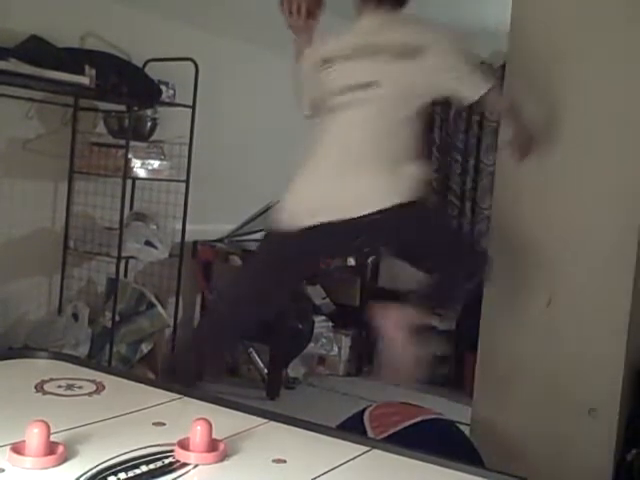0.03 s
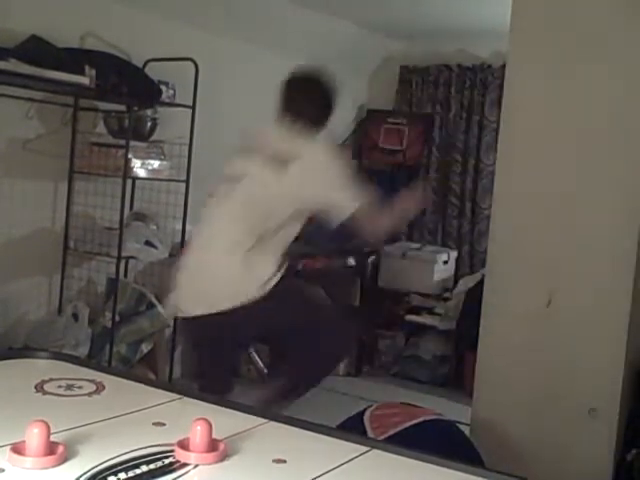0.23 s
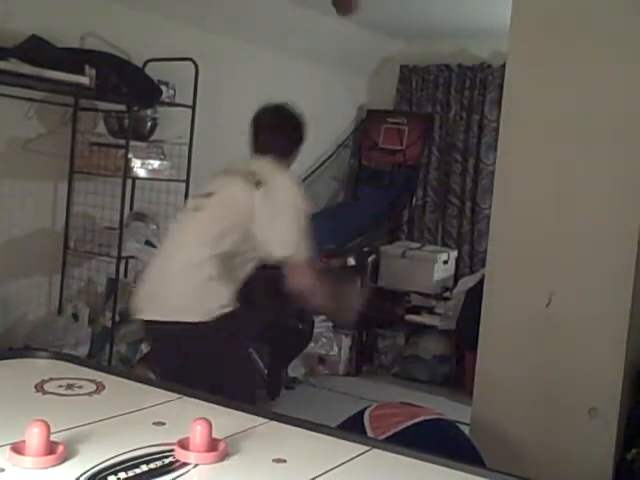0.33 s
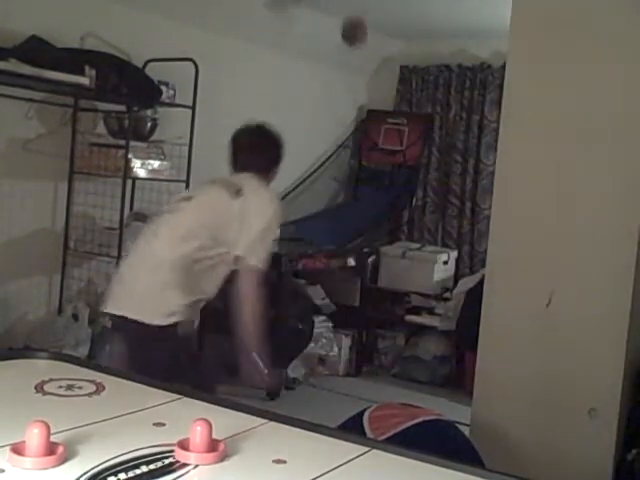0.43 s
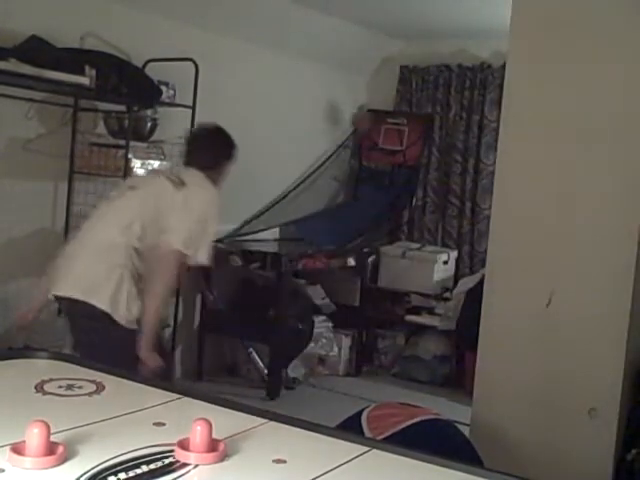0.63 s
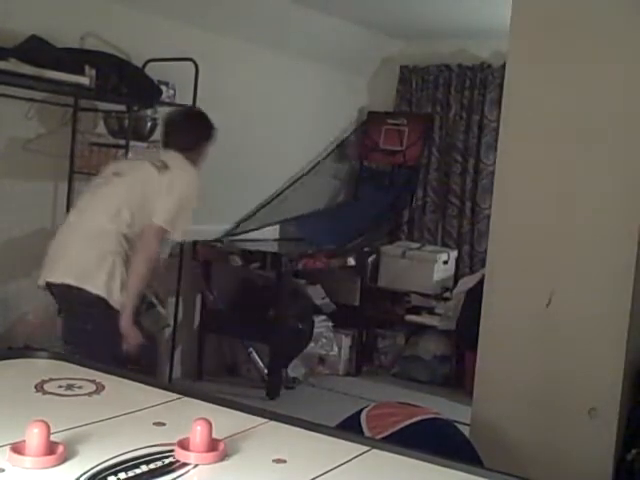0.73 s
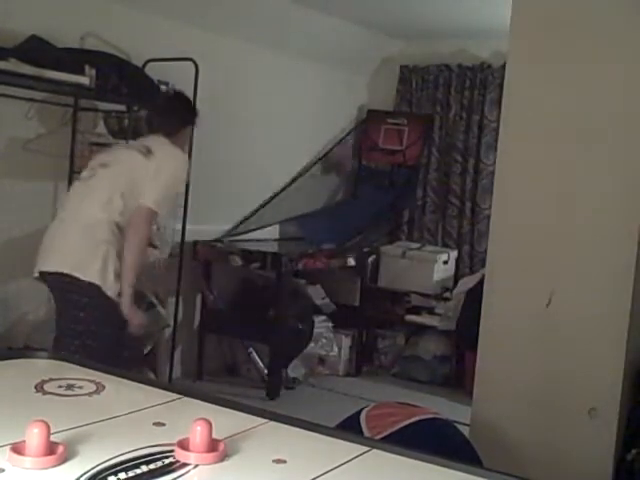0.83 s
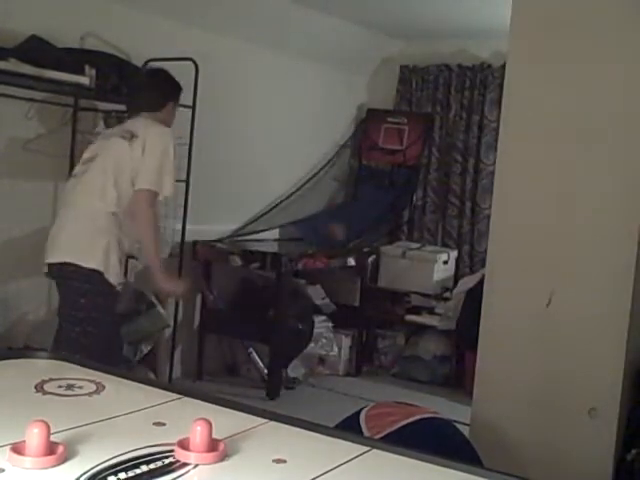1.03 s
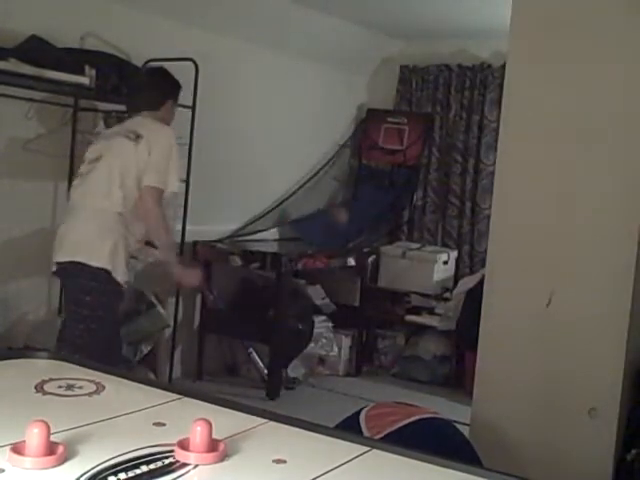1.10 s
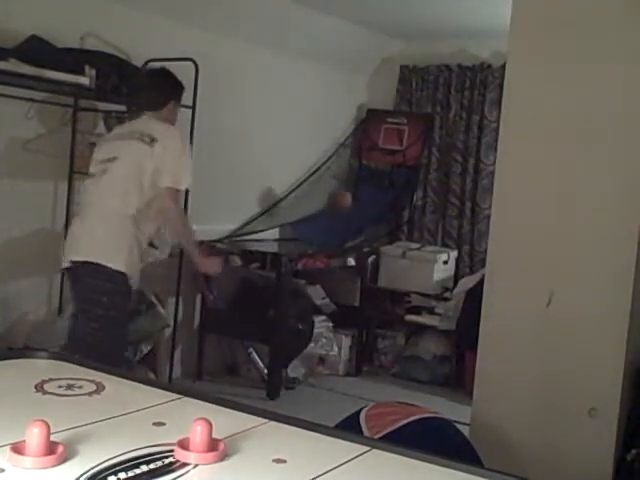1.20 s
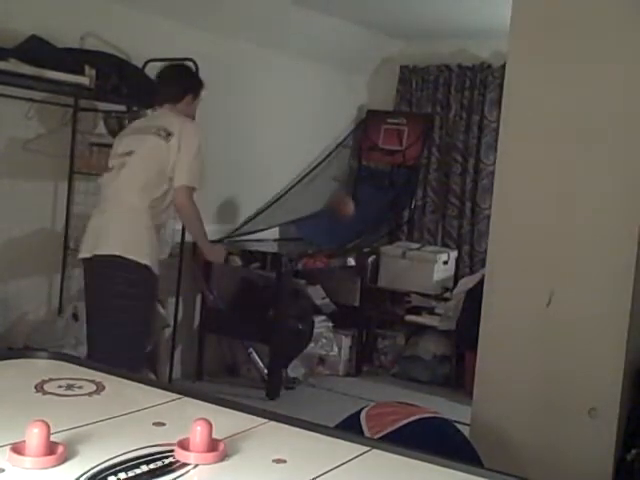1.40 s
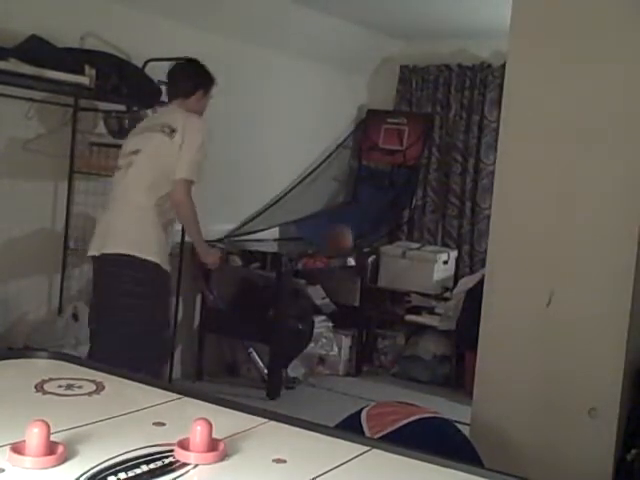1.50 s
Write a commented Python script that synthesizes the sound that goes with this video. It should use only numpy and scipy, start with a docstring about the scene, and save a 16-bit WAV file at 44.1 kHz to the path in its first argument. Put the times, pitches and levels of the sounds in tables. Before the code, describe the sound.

Small balls crack against an arcade basketball hoop just after a heavy landing thud indoors.

```python
"""Clothes rustle and a player lands from a jump on a carpeted floor, then steps aside: the boards boom,
the joists sway, the soles scuff. Small tossed balls crack against the backboard and rim of an arcade
hoop, rattle through the net, and one strikes again lower down. The blows ring the rim and shake the
stand and the floor. The small games room echoes them over a faint hiss."""
import sys
import numpy as np
from scipy import signal
from scipy.fft import rfft, irfft
from scipy.io import wavfile
from scipy.ndimage import uniform_filter1d

SR = 44100
rng = np.random.default_rng(int(sys.argv[2]) if len(sys.argv) > 2 else 0)


def wrap_up_sound(samples):
    """Save the sound to the file named by the first command line argument, as 16-bit audio."""
    columns = np.atleast_2d(samples).T
    # keep every value between -1 and 1, then stretch to whole-number steps
    tamed = np.clip(columns, -1, 1)
    steps = np.round(tamed * 32767).astype(np.int16)
    wavfile.write(sys.argv[1], SR, steps)


N = 68355

# Noise spectra. Each row: frequency in Hz, relative level in dB.
AIR_SPECTRUM = [(20, -3), (35, -2.5), (70, -8.5), (150, -16.5), (300, -18.5), (700, -25), (2000, -32),
                (6000, -36.5), (15500, -37.5)]
CLOTH_SPECTRUM = [(100, 15), (400, 0), (900, -4), (2000, -3), (4500, -3.5), (7000, -8), (15000, -13)]
THUD_SPECTRUM = [(30, -6), (110, 1), (260, 1.5), (360, -4), (500, -29), (900, -48), (3000, -70)]
SCUFF_SPECTRUM = [(150, 3), (550, -3.5), (800, -9), (1150, -6.5), (1700, -14.5), (3000, -19), (6000, -32),
                  (15000, -34.5)]
NET_SPECTRUM = [(100, 11), (400, -3.5), (1300, 0.5), (2500, -1.5), (4300, -6), (6000, -10.5), (10000, -19),
                (15000, -30)]
CRACK_SPECTRUM = [(200, -35), (900, -2), (2200, -4.5), (3300, -0.5), (4800, 2), (6800, -7), (9000, -2.5),
                  (11800, -8), (13500, -5.5), (16000, -2)]
ECHO_SPECTRUM = [(150, -9), (700, -5), (2000, 1.5), (3200, 3.5), (5000, 2.5), (6800, -0.5), (9000, 0.5),
                 (11800, -5), (15500, -6)]
BOARD_SPECTRUM = [(60, 3.5), (200, -2), (430, -1.5), (700, -5), (1100, -3.5), (1700, -10.5), (2800, -21),
                  (8000, -40)]
# Resonances. Each row: frequency in Hz, relative level in dB, T60 in seconds.
FLOOR_MODES = [(59.4, -5.5, 0.51), (109.7, -3, 0.25), (128, -5.5, .33), (164.6, -4, 0.15), (221.6, 2, 0.19),
               (247.6, -0.5, 0.19), (272.6, 2, 0.12), (318.1, -7, 0.21), (405, -11.5, .2), (553, -25, 0.3)]
JOIST_MODES = [(28.28, 14, 0.66), (43.2, -1, 0.48)]
STAND_MODES = [(45.2, -1, 0.35), (60.65, -1.5, 0.72), (128.5, 1.5, 0.46), (210.8, 5, .18),
               (259.6, -7, 0.23), (309.7, -3.5, 0.18), (418, 4, 0.18)]
RIM_MODES = [(544, -1, 0.54), (680, -8, 0.49), (966, 8, 0.17), (1092, -8, 0.088), (1168, -6, 0.63),
             (1495, 0, 0.33), (2550, -0.5, 0.4), (2770, 9.5, 0.17), (3090, -2, 0.14), (3295, 7.5, 0.11),
             (3410, 0.5, 0.31), (3870, -7, .26), (4234, -2.5, 0.66), (4900, -19, 0.2), (4921, 6, 0.093),
             (7430, -4, 0.34)]
# Clothes moving. Each row: centre in seconds, half length in seconds, level in dB.
SWISHES = [(.03, 0.076, -62), (.155, 0.066, -59.5), (.28, 0.035, -61), (.42, 0.16, -67),
           (.54, 0.047, -58.5), (.64, 0.084, -63), (.715, 0.049, -55.5)]
# Soles on carpet. Each row: centre and half length in seconds, pitch and width in Hz, level in dB.
SOLE_RUBS = [(.38, 0.081, 1100, 420, -62), (0.384, 0.081, 560, 270, -61), (0.68, 0.016, 780, 120, -68),
             (0.1973, 0.039, 294, 260, -59)]
# Feet on the floor. Each row: start in seconds, then boom, sway and scuff levels in dB.
FOOTFALLS = [(.208, -29.5, -37.5, -42.5), (0.2155, -18.5, -35.5, -47), (.256, -31.5, -39.5, -68),
             (0.311, -48, -33.5, -65), (.476, -45, -68, -52), (0.515, -44, -38, -58.5),
             (0.557, -48, -70, -65), (1.43, -66, -57, -72)]
# Balls in the net and on the cloth ramp. Each row: centre and half length in seconds, level in dB.
NET_RUNS = [(.885, 0.039, -43), (.94, 0.039, -47.5), (1.06, .04, -66), (1.25, 0.065, -66),
            (1.34, 0.034, -69), (1.505, 0.0072, -66)]
# Cord sliding over a ball. Each row: centre and half length in seconds, pitch in Hz,
# rise in Hz per second, width in Hz, level in dB.
CORD_ZIPS = [(0.927, 0.018, 13400, 44995, 2000, -55.5), (0.987, 0.0073, 5650, 0, 4000, -54)]
# Hollow panel knocks. Each row: start in seconds, frequency in Hz, T60 in seconds, level in dB.
PANEL_KNOCKS = [(.7555, 205, 0.096, -27.5), (1.0975, 245.6, 0.24, -42.5), (1.1, 433.2, 0.17, -38.5)]
# Shoves on the stand. Each row: start in seconds, then stand and floor sway levels in dB.
STAND_SHOVES = [(0.754, -35.5, -37.5), (.799, -38.5, -38.5), (0.87, -46, -47), (0.987, -46.5, -50),
                (1.098, -40.5, -47.5), (1.14, -47, -41), (1.493, -60.5, -73)]
# Ball impacts. Each row: start and contact time in seconds, then crack, echo, board and rim gains in dB.
BALL_BLOWS = [(0.73, 0.00063, -42, -41, -42, -57), (0.7552, 0.00053, -16, -28.5, -38.5, -39.5),
              (0.7625, 0.00063, -18.5, -40, -35.5, -41), (.798, .003, -43, -56, -37.5, -39.5),
              (.857, 0.0015, -34.5, -53, -49, -47.5), (.897, 0.0016, -44, -56, -50, -59),
              (0.928, .003, -28, -53.5, -53.5, -55), (0.983, 0.0032, -41, -54, -47, -58),
              (1.0795, 0.0028, -51, -49, -47.5, -71), (1.0975, 0.00027, -27, -36.5, -33.5, -44.5),
              (1.1003, 0.00051, -23.5, -39.5, -35.5, -60)]

AIR_DB, THUD_DB, LATE_ECHO_DB = -61.5, -7.5, -24.5
HEEL_RISE_S, SWAY_RISE_S, BODY_RISE_S, KNOCK_RISE_S, ECHO_RISE_S = 0.0024, 0.0025, 0.0025, 0.0031, 0.0045
ECHO_SPLIT_HZ, CRACK_TOP_HZ, SOFT_CONTACT_S = 6450, 19800, 0.0034
MODE_SCATTER_DB = 1.5


def undb(db):
    """Decibels to gain."""
    return 10 ** (np.asarray(db) / 20)


def unit_rms(x):
    """Scale to rms 1."""
    return x / np.sqrt(np.mean(x ** 2))


def lowpass(hz):
    """Second-order Butterworth sections."""
    return signal.butter(2, hz, fs=SR, output="sos")


def noise(spectrum):
    """Shaped noise, rms 1."""
    hz, db = np.array(spectrum, float).T
    bins_hz = np.maximum(np.fft.rfftfreq(N, 1 / SR), 1)
    gains = undb(np.interp(np.log(bins_hz), np.log(hz), db))
    return unit_rms(irfft(rfft(rng.standard_normal(N)) * gains, N))


def grain(depth_db, samples):
    """Random level flutter, smoothed over `samples`."""
    flutter = unit_rms(uniform_filter1d(rng.standard_normal(N), samples))
    return unit_rms(undb(depth_db * flutter))


def since(start_s):
    """Seconds since the start, zero before it."""
    return np.maximum(np.arange(N) / SR - start_s, 0)


def struck(start_s, rise_s, t60_s):
    """Quick rise, exponential decay."""
    t = since(start_s)
    return (1 - np.exp(-t / rise_s)) * np.exp(-np.log(1000) * t / t60_s)


def swell(centre_s, half_s):
    """Gaussian rise and fall."""
    return np.exp(-((np.arange(N) / SR - centre_s) / half_s) ** 2)


def ring(modes, start_s, rise_s):
    """Decaying modes; each blow shares its energy among them a little differently."""
    t = since(start_s)
    gains = undb(np.array(modes)[:, 1] + MODE_SCATTER_DB * rng.standard_normal(len(modes)))
    out = sum(gain * np.sin(2 * np.pi * hz * t) * struck(start_s, rise_s, t60_s)
              for gain, (hz, _, t60_s) in zip(gains, modes))
    return out / np.sqrt(np.sum(gains ** 2) / 2)


def rustle(moves, spectrum, grain_db):
    """Sliding fabric: grainy noise that swells with each move."""
    power = sum((undb(db) * swell(centre_s, half_s)) ** 2 for centre_s, half_s, db in moves)
    return noise(spectrum) * grain(grain_db, samples=130) * np.sqrt(power)


def rub(centre_s, half_s, hz, width_hz, rise_hz_per_s=0):
    """A short band of friction noise with optional glide."""
    t = np.arange(N) / SR - centre_s
    baseband = signal.sosfilt(lowpass(width_hz / 2), rng.standard_normal(N) + 1j * rng.standard_normal(N))
    carrier = np.exp(2j * np.pi * (hz + rise_hz_per_s * t / 2) * t)
    return swell(centre_s, half_s) * unit_rms(np.real(baseband * carrier))


def room_air():
    """Faint steady rumble and hiss."""
    return undb(AIR_DB) * noise(AIR_SPECTRUM)


def clothes():
    """Cloth slides as the player moves."""
    return rustle(SWISHES, CLOTH_SPECTRUM, grain_db=1)


def soles():
    """Turning feet rub the carpet."""
    return sum(undb(db) * rub(centre_s, half_s, hz, width_hz)
               for centre_s, half_s, hz, width_hz, db in SOLE_RUBS)


def feet():
    """Each footfall booms in the boards, sways the joists and scuffs the carpet."""
    out = np.zeros(N)
    for start_s, boom_db, sway_db, scuff_db in FOOTFALLS:
        boards = ring(FLOOR_MODES, start_s, HEEL_RISE_S)
        thud = undb(THUD_DB) * noise(THUD_SPECTRUM) * struck(start_s, HEEL_RISE_S, t60_s=0.29)
        out += undb(boom_db) * (boards + thud)
        out += undb(sway_db) * ring(JOIST_MODES, start_s, SWAY_RISE_S)
        out += undb(scuff_db) * noise(SCUFF_SPECTRUM) * struck(start_s, HEEL_RISE_S, t60_s=0.4)
    return out


def net():
    """Cords zip and mesh rustles as the balls slide through."""
    zips = sum(undb(db) * rub(centre_s, half_s, hz, width_hz, rise_hz_per_s)
               for centre_s, half_s, hz, rise_hz_per_s, width_hz, db in CORD_ZIPS)
    return zips + rustle(NET_RUNS, NET_SPECTRUM, grain_db=3)


def stand():
    """The balls' weight knocks the panels and shakes the stand and, through its legs, the floor."""
    out = np.zeros(N)
    for start_s, hz, t60_s, db in PANEL_KNOCKS:
        out += undb(db) * ring([(hz, 0, t60_s)], start_s, KNOCK_RISE_S)
    for start_s, stand_db, sway_db in STAND_SHOVES:
        out += undb(stand_db) * ring(STAND_MODES, start_s, BODY_RISE_S)
        out += undb(sway_db) * ring(JOIST_MODES, start_s, SWAY_RISE_S)
    return out


def room_echoes(start_s):
    """Dense reflections of one blow; the treble dies first."""
    echoes = noise(ECHO_SPECTRUM) * grain(depth_db=1, samples=60)
    low = signal.sosfiltfilt(lowpass(ECHO_SPLIT_HZ), echoes)
    treble = echoes - low
    early_fade = struck(start_s, ECHO_RISE_S, t60_s=0.25)
    late_fade = undb(LATE_ECHO_DB) * struck(start_s, ECHO_RISE_S, t60_s=0.99)
    return low * (early_fade + late_fade) + treble * struck(start_s, ECHO_RISE_S, t60_s=0.24)


def balls():
    """Each blow cracks, echoes, sounds the hollow board and rings the rim."""
    out = np.zeros(N)
    for start_s, contact_s, crack_db, echo_db, board_db, rim_db in BALL_BLOWS:
        crack = undb(crack_db) * noise(CRACK_SPECTRUM) * struck(start_s, contact_s, t60_s=0.022)
        echoes = undb(echo_db) * room_echoes(start_s)
        cutoff_hz = CRACK_TOP_HZ / (1 + contact_s / SOFT_CONTACT_S)  # longer contact, duller crack
        out += signal.sosfilt(lowpass(cutoff_hz), crack + echoes)
        out += undb(board_db) * noise(BOARD_SPECTRUM) * struck(start_s, BODY_RISE_S, t60_s=0.28)
        out += undb(rim_db) * ring(RIM_MODES, start_s, contact_s)
    return out


def scene():
    """Player, hoop and room air, mono."""
    player = feet() + soles() + clothes()
    hoop = balls() + stand() + net()
    return (player + hoop + room_air())[None]


def record(dry):
    """Microphone passband, 15 Hz to 15650 Hz."""
    low_cut = signal.butter(2, 15, "high", fs=SR, output="sos")
    top_cut = signal.ellip(10, .2, 80, 15650, fs=SR, output="sos")
    return signal.sosfilt(top_cut, signal.sosfilt(low_cut, dry))


dry = scene()
out = record(dry)
wrap_up_sound(out)
```